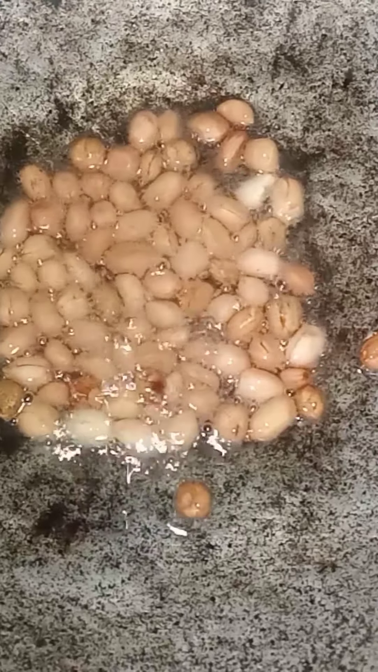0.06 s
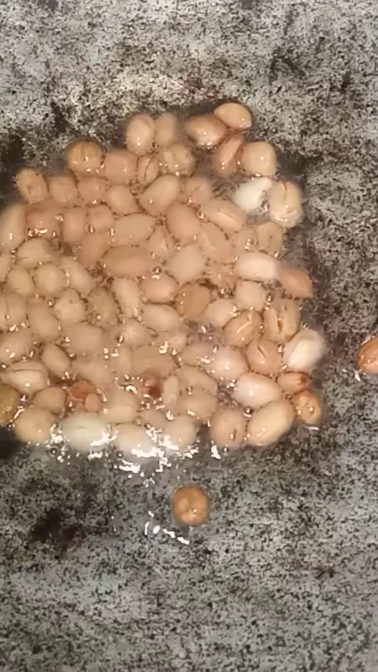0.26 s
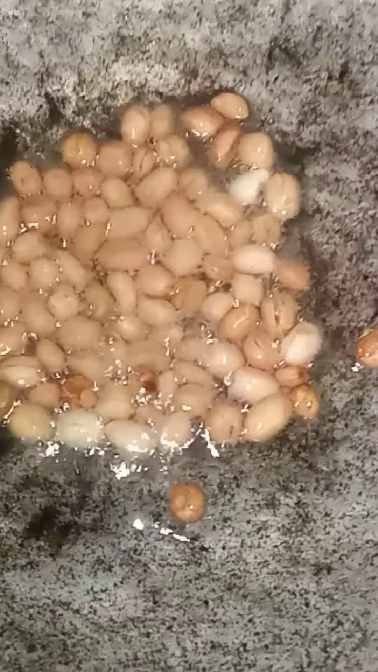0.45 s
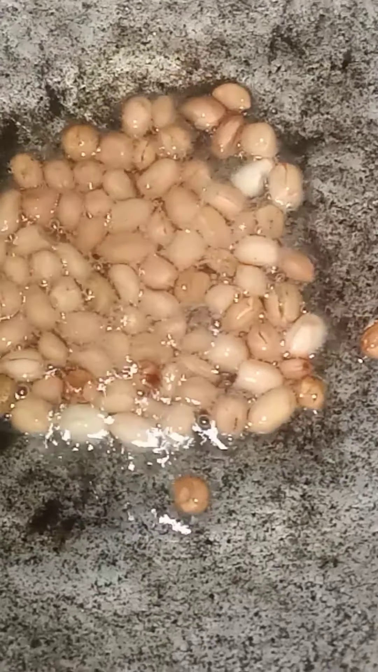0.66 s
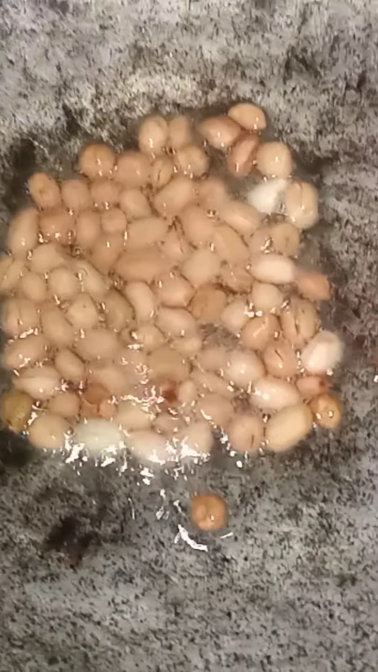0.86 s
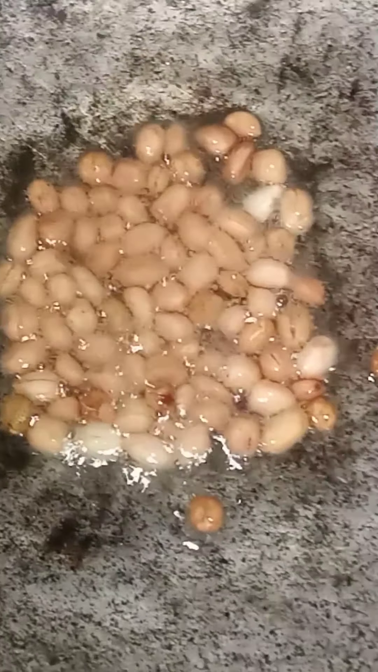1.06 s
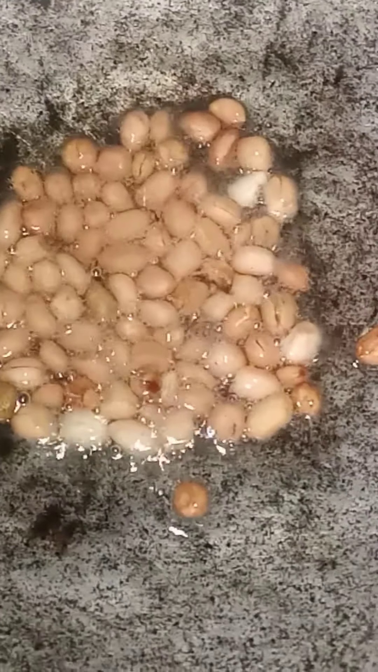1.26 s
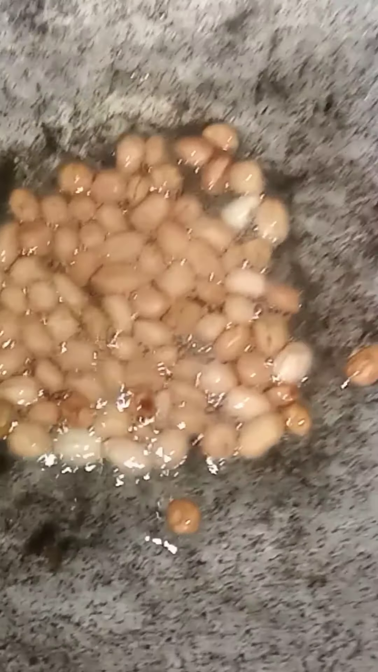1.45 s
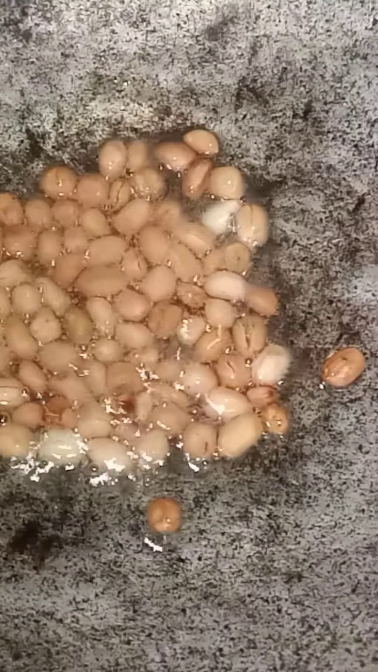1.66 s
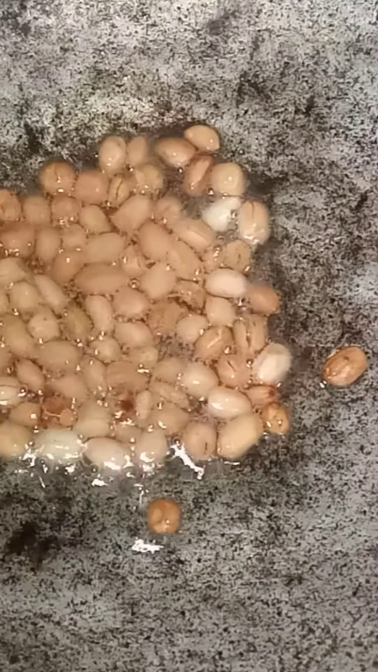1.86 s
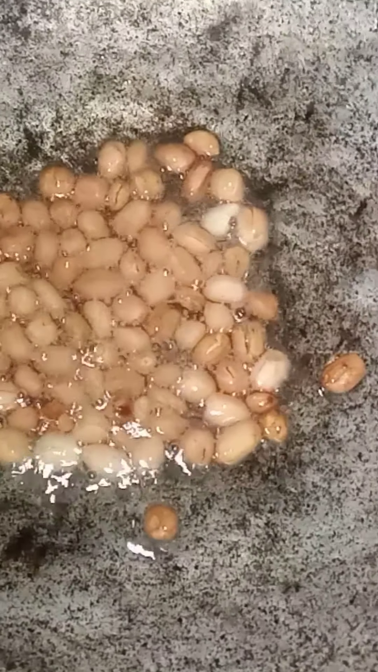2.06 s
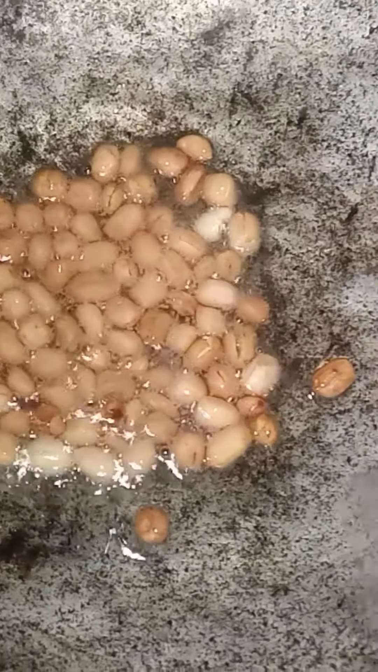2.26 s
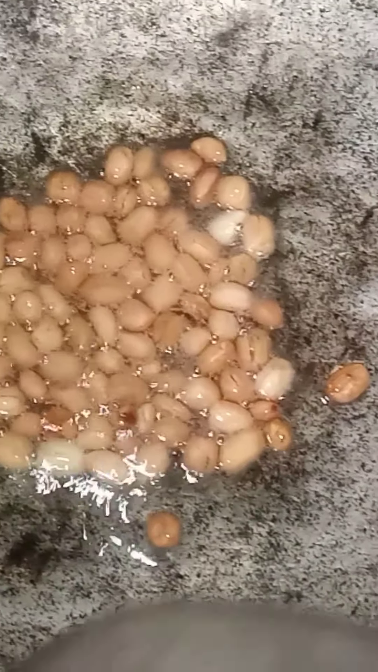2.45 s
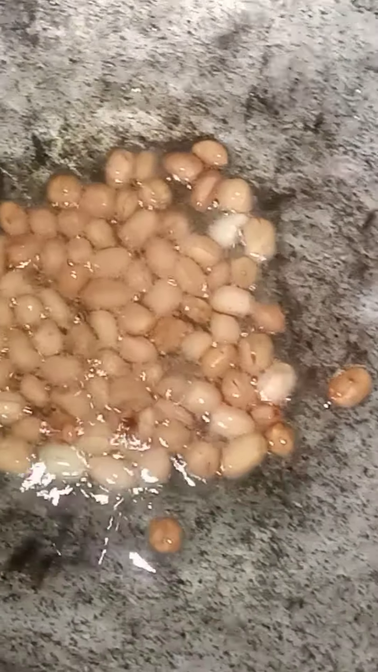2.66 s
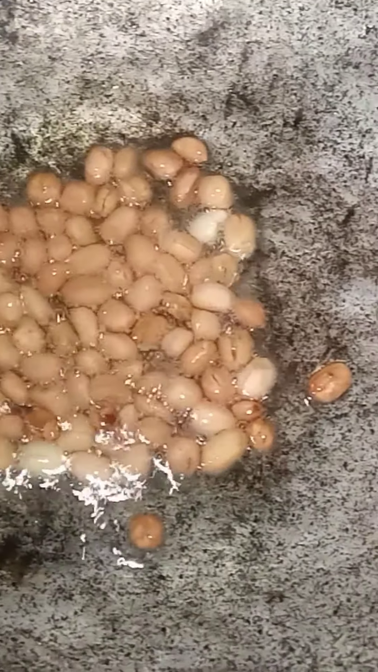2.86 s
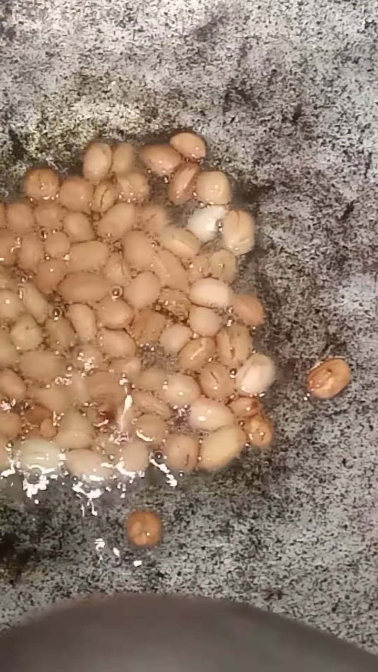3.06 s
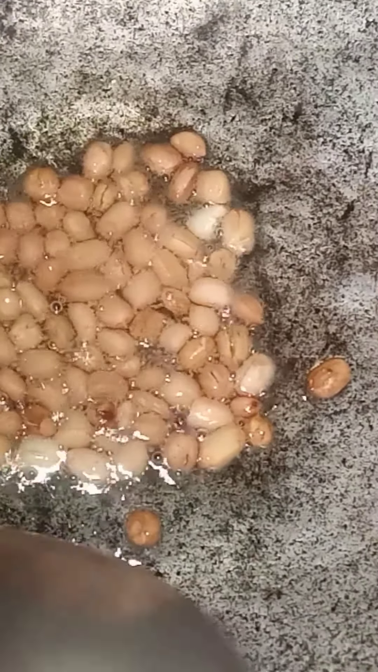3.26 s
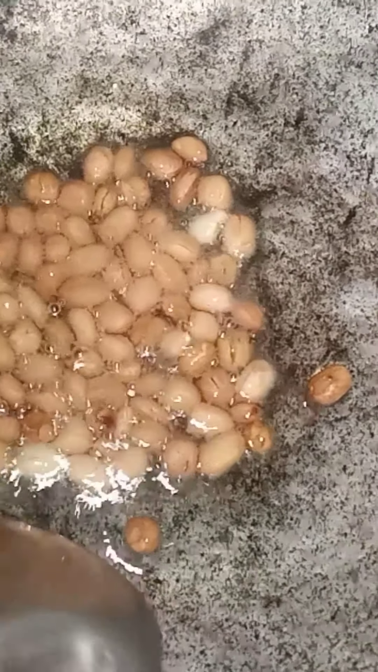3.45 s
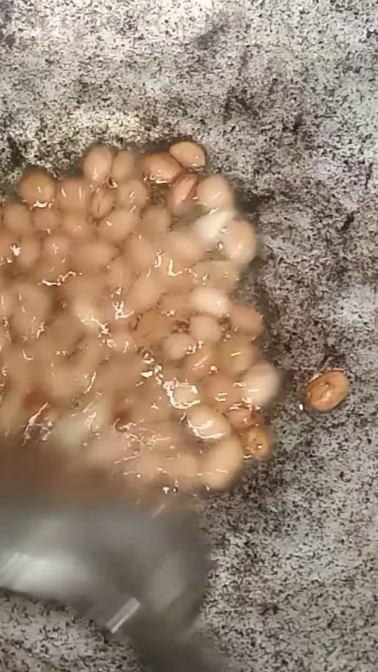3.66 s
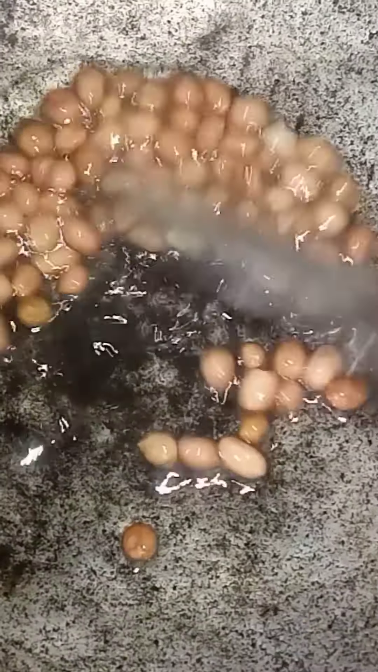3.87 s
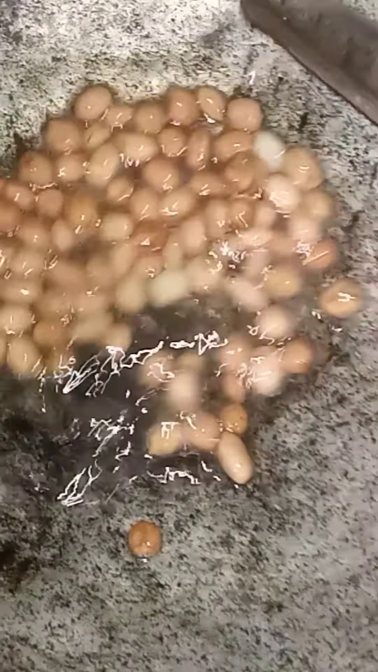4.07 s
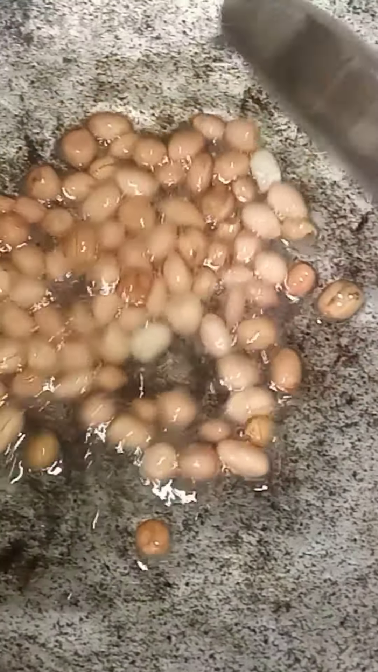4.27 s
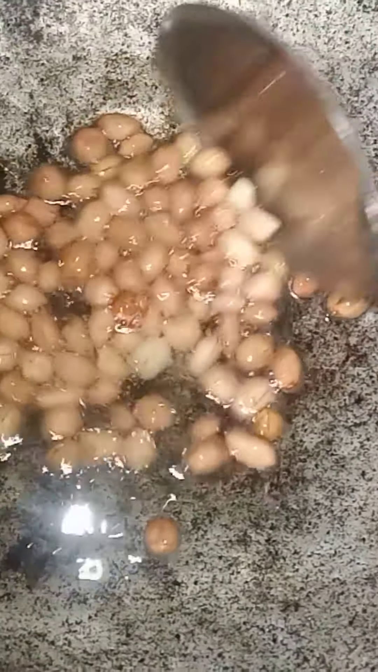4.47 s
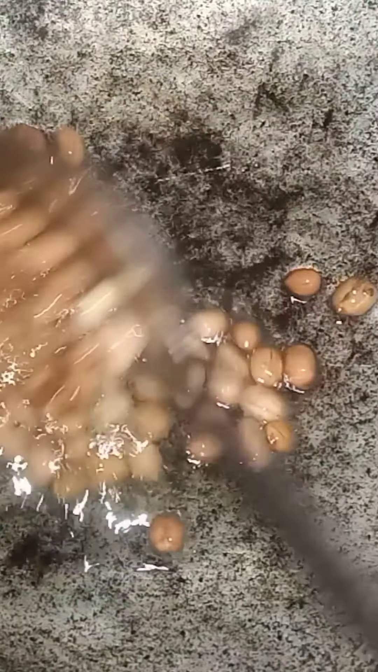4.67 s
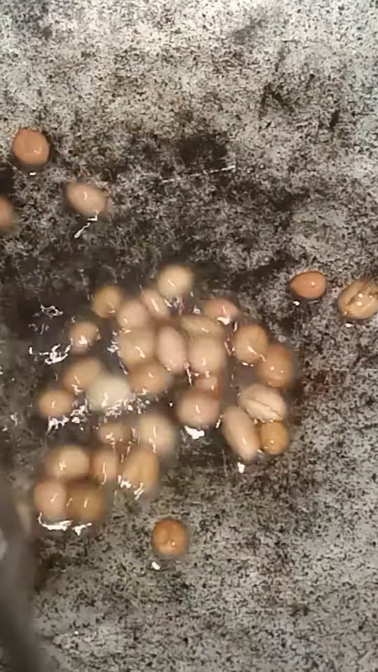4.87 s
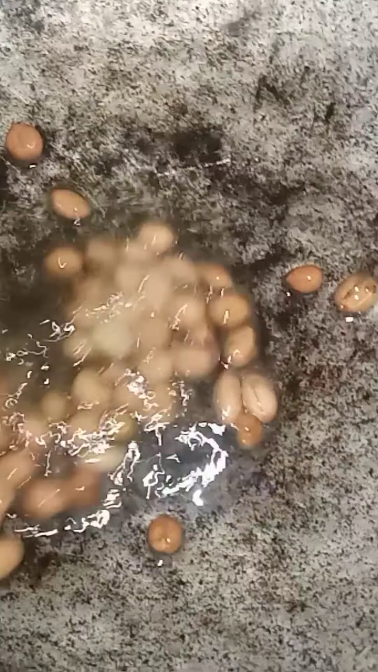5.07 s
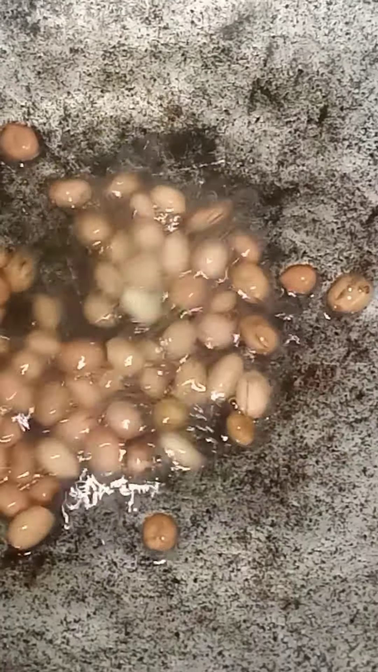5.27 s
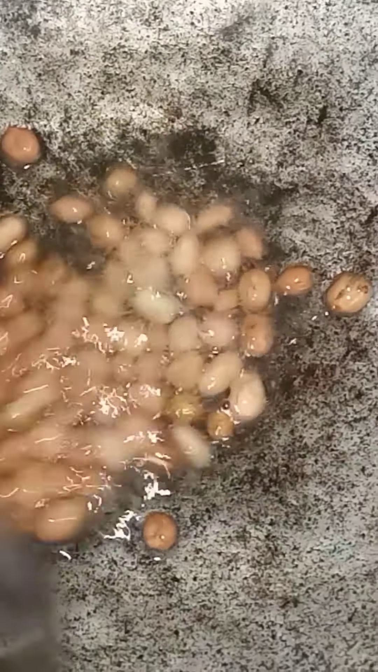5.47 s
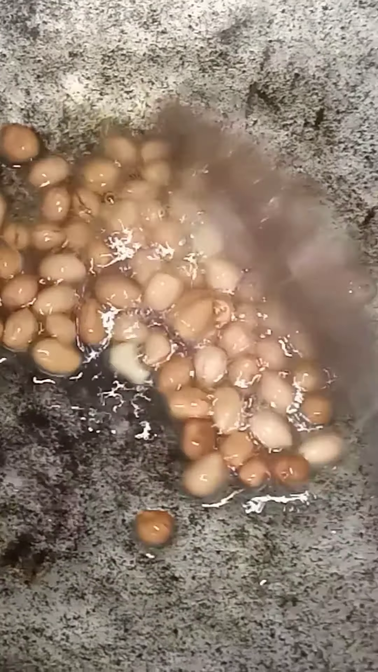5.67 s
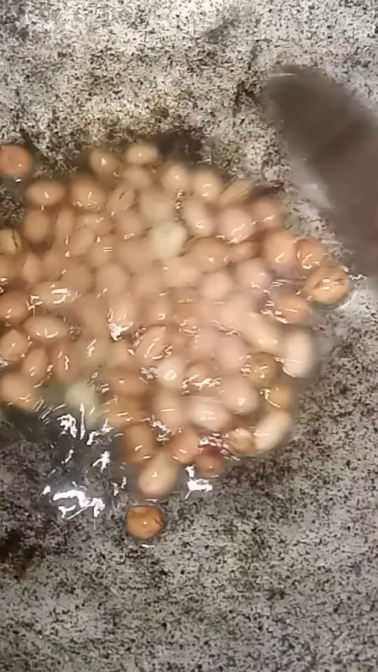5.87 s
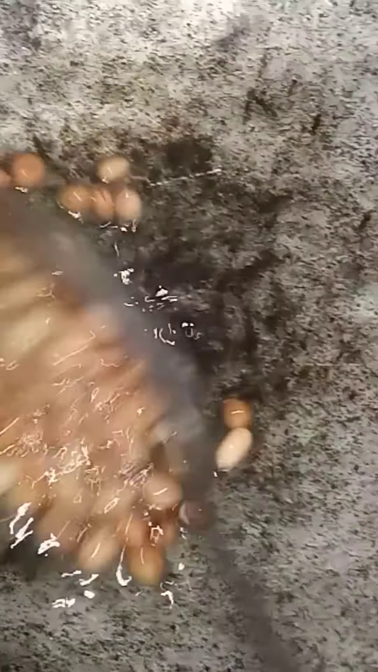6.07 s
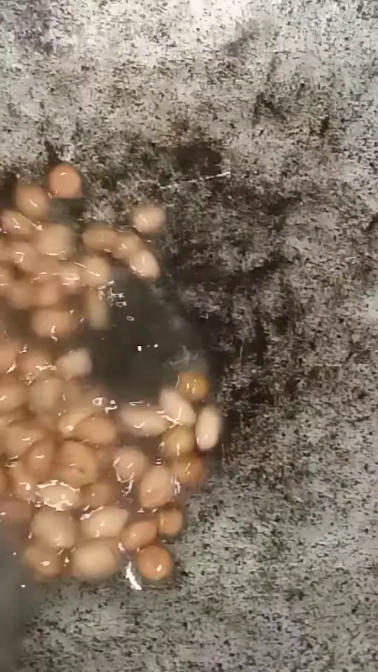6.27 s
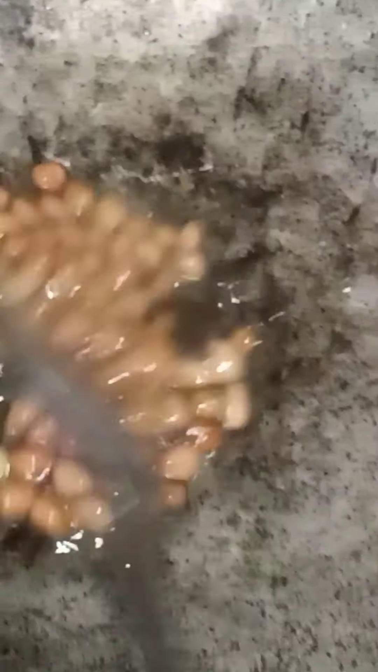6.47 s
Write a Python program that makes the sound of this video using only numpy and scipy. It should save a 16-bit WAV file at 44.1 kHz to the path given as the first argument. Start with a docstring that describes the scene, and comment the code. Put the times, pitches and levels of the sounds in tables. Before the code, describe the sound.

Close up in a small indoor space, peanuts fry with a faint, even, bright sizzle and barely audible pops over a very low rumble. After more than three seconds a metal ladle comes in suddenly: hard clanks and short rough scrapes against a heavy pan, with nuts clacking and rolling. The stirring comes in bursts, much louder than the oil, and grows busier towards the end.

```python
"""A metal ladle stirs peanuts in a heavy pan: it knocks and scrapes, and the shoved nuts clack and roll.
Knocks and friction are clicks and grains that ring the tuned modes of pan and ladle, with short crunches of noise.
Before and beneath the stirring, peanuts sizzle in hot oil: random bubble clicks, shaped into a hiss,
with faint pops and one short scuff made of noise crunches.
Far below lies a faint rumble of filtered noise with a few soft thuds."""
import sys
import numpy as np
from scipy import signal
from scipy.fft import rfft, irfft, next_fast_len
from scipy.io import wavfile
from scipy.ndimage import uniform_filter1d

SR = 44100
rng = np.random.default_rng(int(sys.argv[2]) if len(sys.argv) > 2 else 0)


def waveform_to_disk(signal):
    """Save audio, clipped to [-1, 1], as 16-bit WAV at the path in sys.argv[1]."""
    frames = np.transpose(np.atleast_2d(signal))
    scaled = np.clip(frames, -1, 1) * 32767
    samples = np.round(scaled).astype(np.int16)
    wavfile.write(sys.argv[1], SR, samples)


N = 287689

# Tones that the pan and the ladle can ring: f/Hz, width/Hz, level/dB
PAN_MODES = [(80.6, 43, -8), (138.4, 8.3, -9.5), (212, 29.5, -1), (271.4, 41, 0), (348, 31.5, -4),
             (460, 48, -7.5), (559.3, 44, -5.5), (762, 154, -4.5), (856, 56, -5.5), (984, 470, -7),
             (1180, 93, -2)]
LADLE_MODES = [(1590, 200, 12.5), (1910, 186, 13), (2330, 90, 6.5), (2820, 590, 10), (3890, 210, 8.5),
               (4186, 92, 6.5), (4666, 170, 8.5), (5080, 110, 13), (5620, 110, 11.5), (6160, 130, 14),
               (6675, 77, 14), (7550, 400, 7), (9980, 310, 3), (15300, 500, -1)]
PAN_TOP_HZ, LADLE_BOTTOM_HZ = 1350, 1520   # filter corners; both bodies are weak between them
RADIATES_HZ = 63.6   # the stirring has little bass below this

# The ladle strikes the pan: t/s, clack level/dB, push on the pan/dB (scaled later), clack f/Hz
BLOWS = [(3.5683, -32.5, -15.5, 1790), (3.6205, -37.5, -30, 1170), (3.6322, -23.5, -28, 5500),
         (3.6922, -34, -33, 5060), (3.7379, -26.5, -42, 5330), (3.7613, -24, -19, 2370),
         (3.7712, -25, -34, 6340), (3.7762, -30.5, -32, 2310), (4.239, -17, -18.5, 5730),
         (4.572, -30, -32, 4050), (4.6811, -32.5, -29, 2150), (4.6885, -30, -41, 3140),
         (4.7505, -29.5, -33, 5260), (5.1081, -36.5, -40, 1230), (5.1659, -31.5, -34.5, 2520),
         (5.4332, -20.5, -18.5, 1215), (5.495, -34, -31, 5870), (5.5058, -16.5, -31.5, 1640),
         (5.5994, -30.5, -49, 1330), (5.7318, -28.5, -50, 1750), (5.896, -18, -17.5, 6400),
         (5.9098, -42, -34, 6600), (6.0546, -21.5, -38, 4430), (6.3952, -30, -38, 1840)]
# Nuts clack against the ladle: t/s, level/dB before filtering, f/Hz
NUT_CLACKS = [(3.579, -25.5, 1130), (4.2487, -26, 5240), (4.5088, -32, 5600), (4.5824, -29, 6200),
              (4.6074, -28, 3230), (4.6559, -31.5, 2760), (4.6943, -31.5, 5950), (4.7252, -32.5, 2520),
              (4.7656, -31, 2680), (4.799, -34, 4800), (4.842, -36.5, 6700), (5.03, -34, 6000),
              (5.157, -35.5, 4480), (5.202, -43, 11200), (5.349, -40, 5250), (5.3637, -29.5, 1700),
              (5.3796, -25.5, 2800), (5.4046, -32, 6200), (5.545, -38, 6150), (5.6187, -25, 6000),
              (5.646, -41, 10600), (5.726, -39, 7500), (5.697, -37, 7800), (5.678, -37.5, 8600),
              (5.741, -33, 2820), (5.7986, -25.5, 3500), (5.94, -26.5, 9150), (5.931, -32, 2880),
              (5.9746, -27.5, 2980), (5.993, -27, 2840), (6.0733, -33, 5000), (6.089, -24.5, 7600),
              (6.1, -30, 1820), (6.11, -31, 5600), (6.1165, -29, 2150), (6.136, -29, 2400),
              (6.1822, -29.5, 13600), (6.1825, -22.5, 5930), (6.192, -34, 4500), (6.212, -35, 6000),
              (6.2572, -35, 2350), (6.288, -33, 3430), (6.296, -34.5, 2130), (6.3, -23.5, 4680),
              (6.3442, -28, 6400), (6.349, -27.5, 7200), (6.385, -37, 5000), (6.425, -25.5, 8400),
              (6.4453, -28, 1160), (6.463, -21, 4100), (6.4768, -22, 4130), (6.486, -34, 12300),
              (6.5164, -26, 2620)]
NUT_IN_PAN_DB = -34   # push on the pan relative to the clack: a nut hardly moves it
OVERTONE_DB, OVERTONE_OCT = -10.5, 0.683   # second pitch of each clack: relative level, farthest reach
SNAP_HZ = 7400
CONTACT_BOTTOM_HZ = 610   # small hard contacts carry no bass
# Blunt swing of the pan at each contact: level against the push, pitch, width
THUMP_DB, THUMP_HZ, THUMP_WIDTH_HZ = 9, 567, 495
# Clinks that ring on after a knock: t/s, level/dB before filtering, f/Hz, ring/cycles
CLINKS = [(3.585, -52, 4740, 60), (5.898, -26, 6400, 100), (6.118, -22.5, 2220, 22),
          (6.156, -21.5, 1006, 8.8), (6.156, -33, 1240, 32), (6.156, -21.5, 1800, 10.4),
          (6.156, -32, 2260, 24), (6.407, -22, 1820, 23), (6.394, -27, 4450, 87)]

# The ladle's edge scrapes the pan: start t/s, length/s, rasp of the edge/dB, drag on the pan/dB,
# fade of the rasp over the scrape/dB, favoured f of the ladle/Hz; gains come before filtering
SCRAPES = [(3.566, 0.053, -31, -36.5, 38, 4660), (3.621, 0.071, -40, -39, 6.5, 4000),
           (3.689, 0.059, -36, -37, 9, 5140), (4.237, 0.3, -43, -36.5, 0, 5470),
           (4.575, 0.049, -38, -45, 59, 3590), (4.686, 0.016, -42, -40.5, 0, 3550),
           (5.434, 0.048, -34.5, -39, 27, 5500), (5.505, 0.044, -35, -35.5, 13.5, 1840),
           (5.897, 0.117, -36, -36, 3, 2920), (6.185, 0.034, -42.5, -52.5, 25, 5340),
           (6.396, 0.049, -30.5, -31, 25, 4100), (6.466, 0.041, -32, -69, 18.5, 4540)]
DRAG_SAG_DB_PER_S = 45   # the push on the pan eases off along a scrape
JERK_DB, JERK_PER_FADE = 2.2, .11   # scrapes that die quickly are jerkier
SPOT_HZ, SPOT_RISE_OCT_PER_S = 330, 1.2   # favoured pitch of the pan climbs as the edge slides on
WANDER_DB, WANDER_HZ = 3.5, 18   # how much and how fast a rubbed mode swells and fades
TICK_DB, TICK_LOW_HZ, TICK_OCT = 10, 2400, 1.6   # most a tick exceeds the rasp, lowest pitch, pitch range
# Narrow wavering bands that sing as metal slides or rings on after a knock:
# start t/s, end t/s, f/Hz, level/dB
SINGING = [(4.27, 4.5, 800, -46), (4.3, 4.46, 1073, -51), (4.26, 4.5, 1700, -57.5), (4.26, 4.53, 2385, -58),
           (6.162, 6.205, 1200, -47.5), (4.3, 4.4, 8520, -61), (4.25, 4.51, 10400, -67),
           (4.26, 4.53, 6000, -53), (3.645, 3.72, 7930, -59), (3.7, 3.748, 9950, -50)]
# Band width at 0 Hz, its growth per Hz of pitch, and its unsteadiness
BAND_WIDTH_HZ, BAND_WIDENS, BAND_WAVER_DB = 50, .008, 3.0

# Nuts roll, most rolls dying away, some swelling (negative fade):
# start t/s, rumble in the pan/dB before filtering, fade/dB per s, length/s
ROLLS = [(3.765, -55.5, 36, 0.38), (4.838, -49, 141, 0.07), (4.95, -65.5, -28, 0.16),
         (5.101, -65, -26, 0.44), (5.555, -42.5, 91, 0.11), (5.702, -40, 248, 0.15),
         (5.802, -41.5, 277, 0.12), (6.009, -48, 120, 0.28), (6.303, -47.5, -4, 0.12)]
ROLL_HZ, ROLL_RISE_OCT_PER_S = 394, 2.2   # favoured pitch in the pan, rising along each roll
ROLL_TOP_HZ = 1080   # rolling nuts stir only the pan's lowest modes
ROLL_JERK_DB, ROLL_LUMP_DB = 3, 2.5   # unsteadiness of the rubbing, lumpiness of the rumble
RUSTLE_HZ, RUSTLE_DB = 2800, -57.5   # faint rustle on the ladle

# Tail of pan and room: time to fall 60 dB, starting level of its noise before filtering
LOW_T60_S, LOW_TAIL_DB = 0.4, -36.5
HIGH_T60_S, HIGH_TAIL_DB = .27, -38.5

# Loudness of the sizzling hiss: t/s, level/dB
SIZZLE = [(0, -54.5), (1.5, -55.5), (3.0, -56), (4.2, -54.5), (6.52, -53)]
# Spectrum of the hiss: f/Hz, level/dB
FIZZ_SPECTRUM = [(1000, -69), (1700, -26), (1990, -22.5), (2170, -25.5), (2340, -14), (3280, -9.5),
                 (3740, -5.5), (4070, -6), (4860, -1), (6750, -1.5), (8220, -10), (9370, -7.5),
                 (12900, -19), (15300, -17.5), (16000, -6.5)]
# Faint narrow bands that stand out of the hiss: start t/s, end t/s, f/Hz, level/dB
HISS_BANDS = [(0, 6.52, 3890, -75)]
# Faint pops in the oil, and one short scuff near 1.35 s made of three overlapping rows:
# t/s, level/dB, f/Hz, ring/cycles
POPS_AND_SCUFF = [(0.31, -46, 3900, 40), (0.361, -55.5, 740, 2.7), (1.343, -50.5, 1290, 4.4),
                  (1.348, -52.5, 626, 2.7), (1.355, -54, 517, 3.0), (3.151, -51, 1820, 28),
                  (3.154, -40.5, 5470, 5.6), (4.2, -46, 1954, 33)]

# Spectrum of the background rumble: f/Hz, level/dB
RUMBLE_SPECTRUM = [(15, -66), (25, -22), (96, -17.5), (125, -2), (154, -19.5), (184, 0.5), (223, -9.5),
                   (393, -22.5), (569, -27.5), (1700, -28), (2210, -43), (3740, -120)]
RUMBLE_DB = -79.5
# Faint low thuds: t/s, level/dB before filtering, f/Hz
THUDS = [(0.452, -52.5, 146), (1.382, -62.5, 140), (3.066, -53, 141), (3.343, -51, 135)]
KNOCK_DB, KNOCK_HZ = -18.5, 1070   # higher knock with each thud, relative to its unfiltered level

CEILING, CUTOFF_HZ = .3, 16000   # where peaks flatten, where the treble ends


def stirring():
    """Friction and knocks drive the pan's low modes and the ladle's high ones; each knock also clacks."""
    drag_gain, rasp_gain, jerk_db, drag_hz, rasp_hz, roll_gain = strokes()
    s, clack_db, push_db, clack_hz = knocks()
    at = np.round(s * SR).astype(int)

    # the edge catches on the rough pan: dense slips whose force comes in jerks
    slips = rms_one(grains(3500, spread_db=-0.5) * from_db(jerk_db * drift(59)))
    bumps = grains(600, spread_db=5.0)
    drag, boom = body(PAN_MODES, bumps, drag_hz, at, push_db - 7.5, 590, reach_db=4.5, scatter_db=4.5)
    rasp, ring = body(LADLE_MODES, slips, rasp_hz, at, clack_db, clack_hz, reach_db=2.5, scatter_db=3.5)
    grit = rms_one(signal.lfilter(*signal.butter(2, 13000, fs=SR), slips))
    clack, snap = clacks_and_snaps(s, clack_db, clack_hz)
    clinks = np.array(CLINKS)
    clink = bursts(clinks[:, :3], clinks[:, 3], rough_s=0.0013)

    rolling = roll_gain * from_db(ROLL_LUMP_DB * drift(11)) * drag
    pan = edge(drag_gain * drag + boom + thump(at, push_db), PAN_TOP_HZ, "low")
    pan = pan + edge(rolling, ROLL_TOP_HZ, "low")
    scraping = rasp_gain * (0.76 * rasp + 0.23 * grit)
    ladle = edge(scraping + ring + snap, LADLE_BOTTOM_HZ, "high")
    contacts = edge(clack + clink + ticks(), CONTACT_BOTTOM_HZ, "high")
    # a pan this small radiates little deep bass
    return edge(pan + ladle + contacts + wavering_bands(SINGING), RADIATES_HZ, "high")


def knocks():
    """Hard contacts, by ladle or nut, hit both bodies: times, clack levels, pushes on the pan, pitches."""
    s, db, hz = np.transpose(NUT_CLACKS)
    nuts = np.c_[s, db, db + NUT_IN_PAN_DB, hz]
    return np.r_[BLOWS, nuts].T


def clacks_and_snaps(s, clack_db, clack_hz):
    """A hard contact crunches at two pitches; the higher the clack, the harder the contact and its snap."""
    clack = bursts(np.c_[s, clack_db, clack_hz], cycles=5.1, rough_s=0.0016)
    octaves = OVERTONE_OCT * rng.uniform(-0.99, 1, len(s))
    other_hz = np.clip(clack_hz * 2 ** octaves, 900, 14000)
    clack = clack + bursts(np.c_[s, clack_db + OVERTONE_DB, other_hz], cycles=4.7, rough_s=0.0063)
    snap_db = clack_db - 36 + 5 * np.log2(clack_hz / SNAP_HZ)
    snap = bursts(np.c_[s, snap_db, np.full(len(s), SNAP_HZ)], cycles=0.71, rough_s=0.00012)
    return clack, snap


def thump(at, push_db):
    """Each contact sets off one blunt, quickly damped swing, opposite in sign to the push."""
    hits = np.zeros(N)
    hits[at] = -from_db(push_db + THUMP_DB)
    return edge(resonate(hits, THUMP_HZ, THUMP_WIDTH_HZ), 140, "high")


def strokes():
    """Turns scrapes and rolls into curves for the rubbing: its gains, jerkiness and favoured pitches."""
    t = np.arange(N) / SR
    drag_gain, rasp_gain, roll_gain = np.zeros((3, N))
    jerk_db, drag_hz, rasp_hz = np.full(N, float(ROLL_JERK_DB)), np.full(N, float(ROLL_HZ)), np.full(N, float(RUSTLE_HZ))
    # from the first roll on, the rustle fills the time between scrapes
    rasp_gain[t >= ROLLS[0][0]] = from_db(RUSTLE_DB)

    for start, db, fade_db_per_s, length in ROLLS:
        on = (t >= start) & (t < start + length)
        since = t[on] - start
        roll_gain[on] = from_db(db - fade_db_per_s * since)
        drag_hz[on] = ROLL_HZ * 2 ** (ROLL_RISE_OCT_PER_S * since)

    for start, length, rasp_db, drag_db, fade_db, hz in SCRAPES:
        on = (t >= start) & (t < start + length)
        since = t[on] - start
        roll_gain[on] = 0   # a scrape replaces the rolling
        drag_gain[on] = from_db(drag_db - DRAG_SAG_DB_PER_S * since)
        rasp_gain[on] = from_db(rasp_db - fade_db * since / length)
        jerk_db[on] = JERK_DB + JERK_PER_FADE * fade_db
        drag_hz[on] = SPOT_HZ * 2 ** (SPOT_RISE_OCT_PER_S * since)
        rasp_hz[on] = hz
    return drag_gain, rasp_gain, jerk_db, drag_hz, rasp_hz, roll_gain


def ticks(count=16):
    """Along every scrape the edge catches on a few grains, each a tick of its own pitch."""
    rows = []
    for start, length, rasp_db, _, fade_db, _ in SCRAPES:
        place_luck, level_luck, pitch_luck = rng.random((3, count))
        along = (np.arange(count) + place_luck) / count
        db = rasp_db - fade_db * along + TICK_DB * np.sqrt(level_luck)
        hz = TICK_LOW_HZ * 2 ** (TICK_OCT * pitch_luck)
        rows += zip(start + length * along, db, hz)
    return bursts(rows, cycles=9.0, rough_s=0.0012)


def body(modes, rub, rub_hz, at, blow_db, blow_hz, reach_db, scatter_db):
    """Rubbing and blows ring the same modes; the spot of contact favours the modes near one pitch."""
    rubbed, struck, power = 0, 0, 0
    luck_db = rng.normal(0, scatter_db, (len(at), len(modes)))
    for k, (hz, width_hz, db) in enumerate(modes):
        gain = from_db(db) * np.sqrt(width_hz) * (-1) ** k   # neighbours alternate in sign
        clicks = np.zeros(N)
        clicks[at] = from_db(blow_db + luck_db[:, k]) * nearness(hz, blow_hz, reach_db)
        struck = struck + gain * resonate(clicks, hz, width_hz)
        # as the contact moves, each mode swells and fades on its own
        share = nearness(hz, rub_hz, reach_db) * from_db(WANDER_DB * drift(WANDER_HZ))
        rubbed = rubbed + gain * resonate(rub * share, hz, width_hz)
        power = power + (from_db(db) * share) ** 2 * SR / (4 * np.pi)
    strength = sum(from_db(2 * db) * width_hz for hz, width_hz, db in modes)
    # even out the rubbing's expected power, so that its gain curve sets the level
    return rubbed / np.sqrt(power), struck / np.sqrt(strength)


def kitchen(x):
    """Pan and room ring on in a dense tail; the lows last longer than the highs."""
    t = np.arange(SR) / SR
    noise = rng.standard_normal((2, len(t))) * (t > .004)   # the tail starts 4 ms late
    low = edge(edge(noise[0], 1090, "low"), 82, "high")
    high = edge(edge(noise[1], 9200, "low"), 1500, "high")
    low = low * from_db(LOW_TAIL_DB - 60 * t / LOW_T60_S)
    high = high * from_db(HIGH_TAIL_DB - 60 * t / HIGH_T60_S)
    return signal.fftconvolve(x, low + high)[:N]


def oil():
    """Thousands of tiny steam bubbles burst each second and melt into a hiss that flickers a little."""
    s, db = np.transpose(SIZZLE)
    level_db = np.interp(np.arange(N) / SR, s, db)
    bubbles = grains(9000, spread_db=2.0)
    hiss = colour(bubbles * from_db(0.56 * drift(32)), FIZZ_SPECTRUM)
    rows = np.array(POPS_AND_SCUFF)
    pops_and_scuff = bursts(rows[:, :3], rows[:, 3], rough_s=.004)
    return from_db(level_db) * hiss + wavering_bands(HISS_BANDS) + pops_and_scuff


def background():
    """A faint unsteady rumble of shaped noise, with a few soft thuds that each carry a higher knock."""
    rumble = colour(rng.standard_normal(N), RUMBLE_SPECTRUM) * from_db(1.8 * drift(6))
    thuds = bursts(THUDS, cycles=7.0, rough_s=.045)
    thuds = edge(edge(thuds, 220, "low"), 92, "high")
    knock_rows = [(s, db + KNOCK_DB, KNOCK_HZ) for s, db, hz in THUDS]
    knock = bursts(knock_rows, cycles=8.0, rough_s=.045)
    return from_db(RUMBLE_DB) * rumble + knock + thuds


def wavering_bands(rows):
    """Noise rung twice at one pitch becomes a narrow band that wavers in level."""
    out, t = 0, np.arange(N) / SR
    for start, end, hz, db in rows:
        width_hz = BAND_WIDTH_HZ + BAND_WIDENS * hz
        tone = resonate(resonate(rng.standard_normal(N), hz, width_hz), hz, width_hz)
        gate = uniform_filter1d(1. * (t > start) * (t < end), size=441)   # 10 ms ramps
        out = out + from_db(db + BAND_WAVER_DB * drift(31)) * rms_one(tone) * gate
    return out


def bursts(rows, cycles, rough_s):
    """Each (t/s, peak/dB, f/Hz) row: a short crunch of noise that rings one pitch for some cycles."""
    t = np.arange(SR // 5) / SR
    out = np.zeros(N + len(t))
    for (s, db, hz), turns in zip(rows, np.broadcast_to(cycles, len(rows))):
        crunch = np.gradient(rng.standard_normal(len(t)) * np.exp(-t / rough_s))
        ring = resonate(crunch, hz, hz / np.clip(turns, .5, 80))
        ring = resonate(ring, hz, hz)   # a broad band around the pitch
        out[round(s * SR):][:len(t)] += from_db(db) * ring / np.abs(ring).max()
    return out[:N]


def grains(per_s, spread_db):
    """Random clicks of random sign and uneven size; rms 1."""
    sizes = from_db(spread_db * np.minimum(rng.exponential(1, N), 4)) * rng.choice([-1, 1], N)
    return rms_one(sizes * (rng.random(N) < per_s / SR))


def resonate(x, hz, width_hz):
    """A damped resonance: a click of height 1 rings as a sine that starts at height 1 and dies away."""
    r, w = np.exp(-np.pi * width_hz / SR), 2 * np.pi * hz / SR
    return signal.lfilter([0, np.sin(w)], [1, -2 * r * np.cos(w), r * r], x + 1e-18)


def nearness(hz, near_hz, reach_db):
    """Gain of a mode that falls by reach_db per octave away from the favoured pitch."""
    return from_db(-reach_db * np.abs(np.log2(hz / near_hz)))


def drift(rate_hz):
    """Slow random wandering, rms 1; one second of run-up is dropped."""
    r = np.exp(-2 * np.pi * rate_hz / SR)
    return rms_one(signal.lfilter([1], [1, -2 * r, r * r], rng.standard_normal(N + SR))[SR:])


def colour(x, spectrum):
    """Filters a sound by a curve of (f/Hz, level/dB) points; rms 1."""
    size = next_fast_len(N)
    hz, db = np.transpose(spectrum)
    bins_hz = np.fft.rfftfreq(size, 1 / SR)
    gain = from_db(np.interp(np.log(bins_hz + 1), np.log(hz), db))
    return rms_one(irfft(rfft(x, size) * gain, size)[:N])


def edge(x, hz, kind):
    """A steep filter that keeps only the low or the high side of a pitch."""
    return signal.sosfilt(signal.butter(4, hz, kind, fs=SR, output="sos"), x)


def from_db(db):
    """Decibels to gain."""
    return 10 ** (np.asarray(db) / 20)


def rms_one(x):
    """Scales a sound to rms 1."""
    return x / np.sqrt(np.mean(x ** 2) + 1e-20)


def scene():
    """Adds up the stirring with its tail, the oil and the background."""
    metal = stirring()
    return (metal + kitchen(metal) + oil() + background())[None]


def record(dry):
    """Rounds off the peaks and cuts the treble above the cutoff."""
    rounded = CEILING * np.tanh(dry / CEILING)
    return signal.sosfilt(signal.cheby2(14, 50, CUTOFF_HZ, fs=SR, output="sos"), rounded)


dry = scene()
out = record(dry)
waveform_to_disk(out)
```